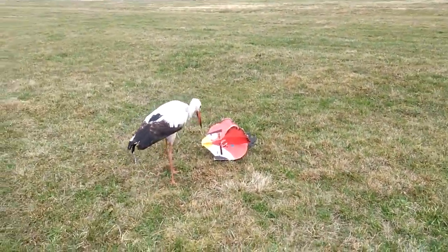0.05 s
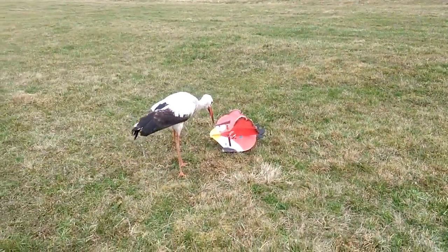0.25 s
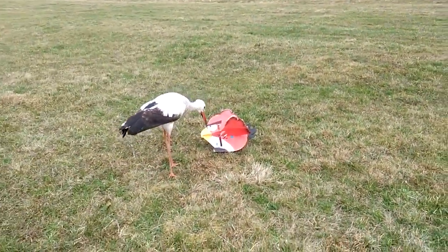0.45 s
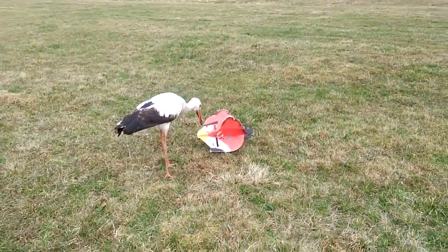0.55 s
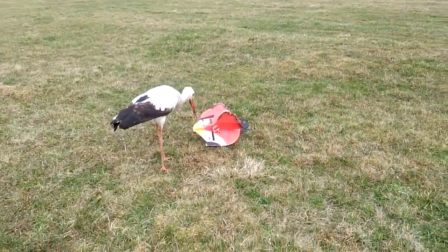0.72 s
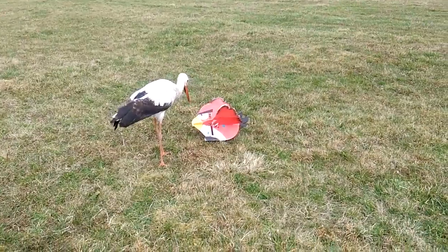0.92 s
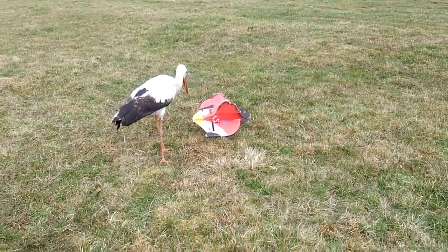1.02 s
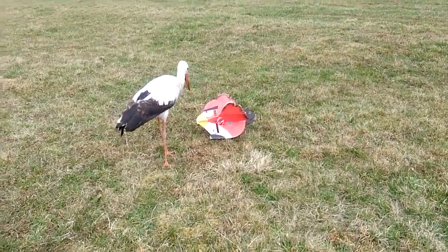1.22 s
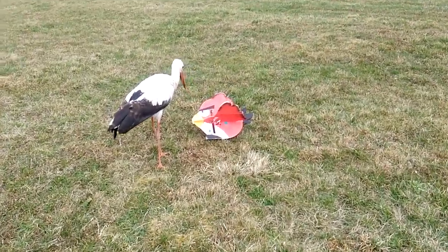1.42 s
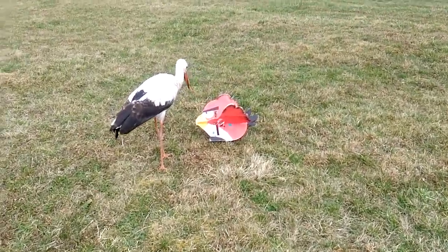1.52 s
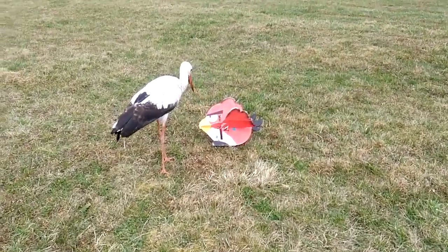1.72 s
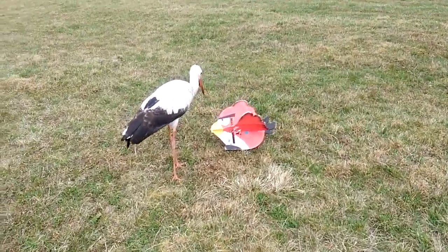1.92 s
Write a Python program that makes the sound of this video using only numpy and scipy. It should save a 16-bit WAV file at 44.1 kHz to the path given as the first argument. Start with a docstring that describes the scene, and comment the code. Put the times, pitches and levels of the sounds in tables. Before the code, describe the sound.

One brief, raspy stork hiss, with wind bumping the microphone and faint grass crackling.

```python
"""Over a very quiet open field, dry grass rustles and a distant small bird chirps faintly twice.
Meanwhile gusts start to hit the microphone with low, soft thumps. At about 0.4 s a stork gives
one short, harsh hiss by pushing air through its throat and bill. The thumps then thin out,
and the grass rustles and crackles close by as its blades rub and its stalks snap."""
import sys
import numpy as np
from scipy import signal
from scipy.fft import rfft, irfft
from scipy.io import wavfile
from scipy.ndimage import map_coordinates

SR = 44100
rng = np.random.default_rng(int(sys.argv[2]) if len(sys.argv) > 2 else 0)


def int16_out(signal):
    """Quantize to a 16-bit WAV file."""
    q = np.round(np.clip(np.atleast_2d(signal).T, -1, 1) * 32767)
    wavfile.write(sys.argv[1], SR, q.astype(np.int16))


N = 85995

# How much left and right differ, most in the treble: pitch_hz, gain_db
STEREO_WIDTH = [(20, -74), (3500, -42), (5500, -17.5), (7300, -2.5), (9000, 3), (14000, 0)]


def amp(db):
    """Turns decibels into a gain."""
    return 10 ** (np.asarray(db) / 20)


def unit(x):
    """Scales a sound to an average power of 1."""
    return x / np.sqrt(np.mean(x ** 2) + 1e-20)


def level(points):
    """Joins points (time_s, level_db) into a gain for every sample."""
    return amp(np.interp(np.arange(N) / SR, *np.transpose(points)))


def colour(x, points):
    """Shapes the tone by points (pitch_hz, gain_db); white noise keeps its power."""
    hz, db = np.transpose(points)
    gain = amp(np.interp(np.log(np.fft.rfftfreq(N, 1 / SR) + 1), np.log(hz), db))
    return irfft(rfft(x) * unit(gain), N)


def flutter(rate_hz):
    """A smooth random wobble, mostly slower than rate_hz."""
    rolloff = 1 + (np.fft.rfftfreq(N, 1 / SR) / rate_hz) ** 4
    return unit(irfft(rfft(rng.standard_normal(N)) / rolloff, N))


def resonance(hz, width_hz):
    """Noise that rings around one pitch."""
    detune = (np.fft.rfftfreq(N, 1 / SR) - hz) / (width_hz / 2)
    return unit(irfft(rfft(rng.standard_normal(N)) / (1 + detune ** 2), N))


def background():
    """Quiet open air with a soft brush of grass, a few faint blips and a thin, wide hiss."""
    # Tone of the open air: pitch_hz, gain_db
    air_tone = [(20, 4.5), (60, -13.5), (150, -10.5), (400, -10), (700, -12.5), (950, -11), (1300, -20),
                (2500, -21.5), (5000, -23), (7000, -31.5), (10000, -25.5), (14000, -25)]
    # A soft brush of grass and a few faint blips: peak_s, half_length_s, level_db, pitch_hz, width_hz
    faint_sounds = [(0.03, 0.068, -84, 920, 107), (0.257, 0.096, -81.5, 3920, 2700),
                    (0.282, 0.032, -78, 870, 110), (0.832, 0.03, -77.5, 636, 117),
                    (0.918, 0.033, -75, 538, 157), (0.899, 0.02, -82, 5280, 794),
                    (1.016, 0.02, -78.5, 947, 70.6), (1.672, 0.005, -71, 790, 450)]
    t = np.arange(N) / SR
    centre = amp(-78) * colour(rng.standard_normal(N), air_tone)
    side = amp(-87) * colour(rng.standard_normal(N), STEREO_WIDTH)
    for peak_s, half_s, db, hz, width_hz in faint_sounds:
        swell = np.exp(-((t - peak_s) / half_s) ** 2 / 2)
        centre += amp(db) * swell * resonance(hz, width_hz)
    return np.array([centre + side, centre - side])


def chirps(pitch_hz=4500, half_length_s=0.0078):
    """A distant small bird: each chirp is one soft swell of a pure tone."""
    # The two chirps: peak_s, level_db
    calls = [(.127, -81.5), (.303, -81.5)]
    t = np.arange(N) / SR
    swells = sum(amp(db) * np.exp(-((t - peak_s) / half_length_s) ** 2 / 2) for peak_s, db in calls)
    return swells * np.sqrt(2) * np.sin(2 * np.pi * pitch_hz * t)


def blades(ticks_per_s=2200, spread_db=3.5, tick_share=0.4):
    """Rubbing grass blades make tiny random ticks over a smooth brushing noise."""
    sizes = amp(spread_db * np.minimum(rng.exponential(1, N), 4))
    signs = rng.choice([-1, 1], N)
    ticks = unit(sizes * signs * (rng.random(N) < ticks_per_s / SR))
    return np.sqrt(tick_share) * ticks + np.sqrt(1 - tick_share) * rng.standard_normal(N)


def rustle(swell_db=1, side_db=-8):
    """Dry grass rubs in uneven swells; its treble spreads left and right."""
    # Strength of the rubbing: time_s, level_db
    rubbing = [(0, -79.5), (.083, -74.5), (.095, -67), (.122, -63), (.155, -64), (.172, -67.5),
               (.195, -61.5), (.29, -69), (.34, -68.5), (.40, -71), (.69, -79), (.75, -90), (.84, -81),
               (1.05, -81.5), (1.10, -70.5), (1.15, -68), (1.185, -72.5), (1.28, -60.5), (1.35, -64),
               (1.47, -67), (1.565, -71.5), (1.59, -78), (1.61, -69.5), (1.84, -70.5), (1.857, -62),
               (1.888, -59.5), (1.905, -69.5), (1.95, -70)]
    # Tone of dry grass: pitch_hz, gain_db
    grass_tone = [(300, -29), (1200, -29.5), (2000, -27), (3400, -27), (4300, -21.5), (5200, -20),
                  (6200, -10), (6850, -0.5), (7350, -1.5), (7750, -5.5), (8700, -11), (10000, -14),
                  (11200, -21.5), (14000, -22.5)]
    strength = level(rubbing) * amp(swell_db * flutter(rate_hz=55.6))
    centre = colour(strength * blades(), grass_tone)
    side = colour(strength * blades(), grass_tone)
    side = amp(side_db) * colour(side, STEREO_WIDTH)
    return np.array([centre + side, centre - side])


def snaps(rise_s=0.00086, decay_s=0.0021):
    """Each dry stalk cracks and rings very briefly at the same few pitches."""
    # Stalks snapping: peak_s, strength_db
    cracks = [(.076, -62.5), (0.108, -58.5), (0.119, -67), (.127, -57), (.332, -59.5), (1.269, -60),
              (1.2795, -50), (1.289, -53), (1.294, -56), (1.2967, -50.5), (1.3038, -53.5), (1.322, -52),
              (1.36, -59), (1.475, -62), (1.783, -62), (1.809, -61.5)]
    # Where a stalk rings: pitch_hz, width_hz, gain_db
    stalk = [(1100, 590, -30.5), (2920, 280, -24.5), (4340, 230, -26), (6990, 950, 2), (9700, 3500, -13.5)]
    t = np.arange(N) / SR
    bursts = sum(amp(db) * np.exp(-np.maximum((peak_s - t) / rise_s, (t - peak_s) / decay_s))
                 for peak_s, db in cracks)
    ringing = sum(amp(db) * resonance(hz, width_hz) for hz, width_hz, db in stalk)
    return bursts * ringing


def wind(half_length_cycles=0.31):
    """Each swirl of air hits the microphone as a brief swing of pressure, over an uneven rumble."""
    # Swirls hitting the microphone: peak_s, level_db, pitch_hz
    thumps = [(0.198, -47.5, 88), (0.235, -44, 108), (0.2531, -32, 313), (0.2563, -25, 175),
              (0.301, -30.5, 232), (0.327, -40, 257), (.336, -30, 118), (.343, -38.5, 192),
              (.354, -30.5, 87), (0.378, -35.5, 94), (0.398, -33.5, 108.5), (0.4104, -42.5, 302),
              (0.411, -30.5, 130), (0.481, -37, 79), (0.502, -40, 105), (0.521, -39.5, 72),
              (0.55, -38.5, 78), (0.644, -47, 245), (0.65, -31, 86), (0.666, -36.5, 55),
              (0.721, -29.5, 64.3), (0.755, -40, 116), (0.766, -41, 137), (.950, -44.5, 154),
              (0.962, -40, 88), (0.976, -31, 61), (1.087, -43.5, 80), (1.113, -44.5, 68),
              (1.602, -48.5, 55.3), (1.728, -59.5, 115), (1.855, -60, 91), (1.873, -51.5, 58.3),
              (1.91, -57, 61)]
    # Strength of the rumble: time_s, level_db
    rumble_levels = [(0, -71.5), (.155, -75), (.22, -48), (.35, -38), (.44, -50.5), (.54, -47),
                     (.585, -64.5), (.65, -48.5), (.765, -46), (.80, -54.5), (.88, -67.5), (.97, -50.5),
                     (1.07, -53.5), (1.16, -64.5), (1.3, -65), (1.42, -72.5), (1.835, -74.5), (1.86, -59),
                     (1.95, -59)]
    # Tone of the rumble: pitch_hz, gain_db
    rumble_tone = [(20, -35), (40, -4.5), (65, 6), (110, -9), (200, -17.5), (350, -35), (600, -42),
                   (1500, -90)]
    t = np.arange(N) / SR
    sound = level(rumble_levels) * unit(colour(rng.standard_normal(N), rumble_tone))
    for (peak_s, db, hz), phase in zip(thumps, rng.random(len(thumps))):
        cycles = np.clip((t - peak_s) * hz, -10, 10)
        swing = np.cos(2 * np.pi * (cycles + phase))
        sound += amp(db) * swing / np.cosh(cycles / half_length_cycles)
    return sound


def wavering(x, pitch_share=0.00515):
    """Lets the pitch of a steady sound wander slightly."""
    speed = 1 + pitch_share * flutter(rate_hz=35.5)
    return map_coordinates(x, [np.cumsum(speed)], order=3, mode="mirror")


def stork_hiss(start_s=0.4045, rise_s=0.041, hold_s=0.04, fall_s=0.08):
    """One push of air rings in the throat and rasps at the bill."""
    # Where the throat and bill ring: pitch_hz, width_hz, gain_db
    throat = [(1226, 420, -16.5), (2094, 220, -6), (2360, 190, -17.5), (2855, 310, -8), (3170, 220, 0),
              (3540, 360, -6.5), (4230, 840, -7.5), (4550, 480, -3), (4920, 130, -12), (5910, 380, -7.5),
              (6150, 650, -6.5), (6580, 180, -12.5), (7140, 480, -2), (7840, 400, -4), (8230, 450, -9.5),
              (9220, 200, -10.5)]
    # Tone of air rubbing past the bill: pitch_hz, gain_db
    rasp_tone = [(500, -22), (2400, -18), (3300, -5), (5300, -17), (8400, 5), (10000, -8), (14000, -20)]
    corners_s = start_s + np.cumsum([0, rise_s, hold_s, fall_s])
    pressure = np.interp(np.arange(N) / SR, corners_s, [0, 1, 1, 0])
    ringing = np.zeros(N)
    for hz, width_hz, db in throat:
        steepness = 2.09 * (hz / 4000) ** 0.78  # high pitches need more push: last in, first out
        ringing += amp(db) * pressure ** steepness * wavering(resonance(hz, width_hz))
    ringing /= np.linalg.norm([amp(db) for _, _, db in throat])
    rasp = amp(-19.5) * pressure ** 2 * colour(rng.standard_normal(N), rasp_tone)
    roughness = np.exp(0.11 * flutter(rate_hz=300))
    return amp(-51) * (ringing + rasp) * roughness


def ground_echo(x, echo_db=-21.5, decay_s=0.076):
    """The direct sound plus a weak, short echo scattered by the ground."""
    tail = rng.standard_normal(N) * np.exp(-np.arange(N) / SR / decay_s)
    return x + amp(echo_db) * signal.fftconvolve(x, tail / np.linalg.norm(tail))[:N]


def scene():
    """The stork and the wind sit in the centre; the rustle spreads wider."""
    return ground_echo(stork_hiss()) + wind() + rustle() + snaps() + chirps() + background()


def record(dry):
    """The microphone drops the deepest bass; then the highest treble is cut."""
    low_hz, high_hz = 42, 14350
    hz = np.fft.rfftfreq(N, 1 / SR)
    thinned = irfft(rfft(dry) / np.sqrt(1 + (low_hz / (hz + 1)) ** 8), N)
    treble_cut = signal.firwin(511, high_hz, window=("kaiser", 9), fs=SR)
    return signal.oaconvolve(thinned, treble_cut[None], "same")


dry = scene()
out = record(dry)
int16_out(out)
```